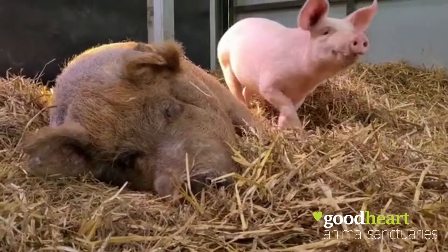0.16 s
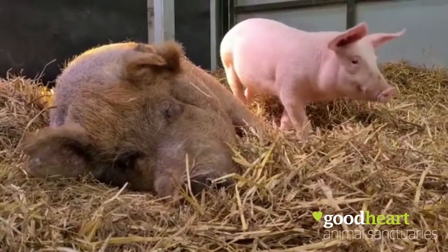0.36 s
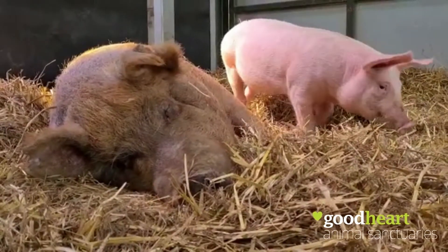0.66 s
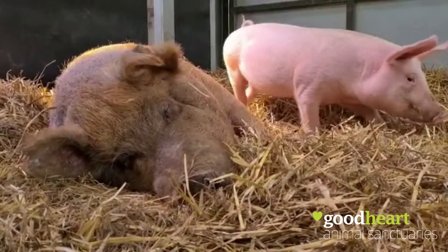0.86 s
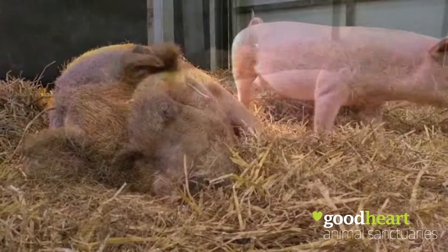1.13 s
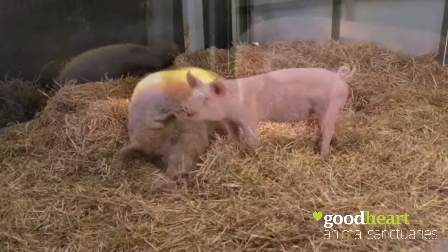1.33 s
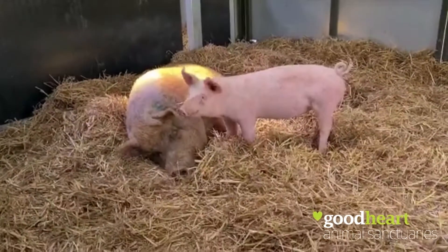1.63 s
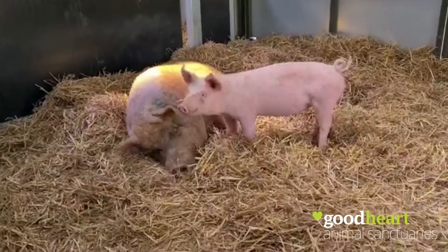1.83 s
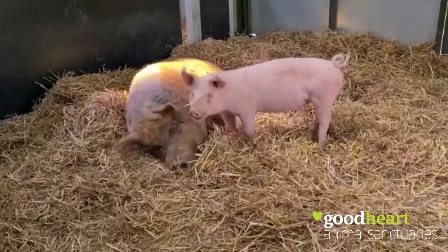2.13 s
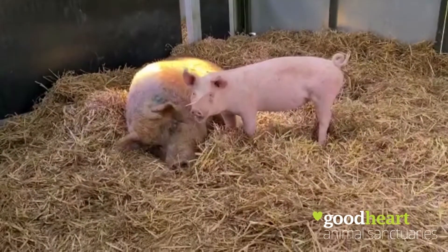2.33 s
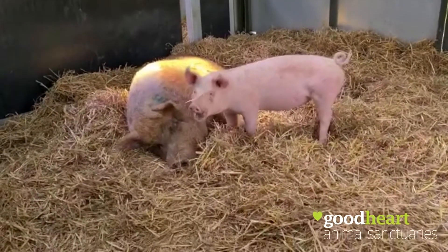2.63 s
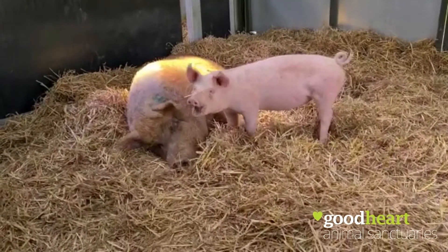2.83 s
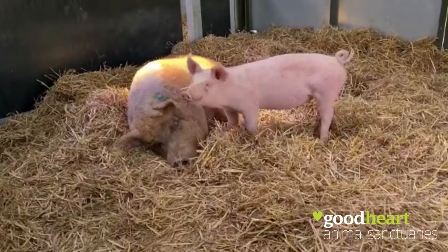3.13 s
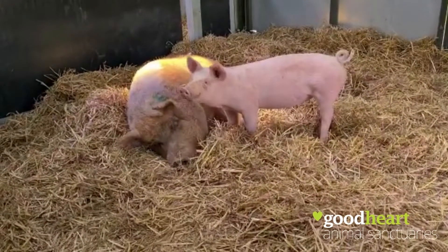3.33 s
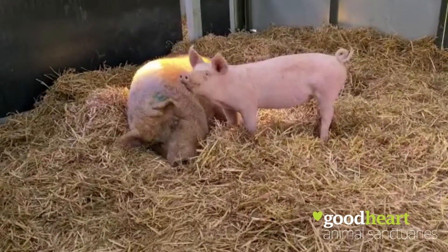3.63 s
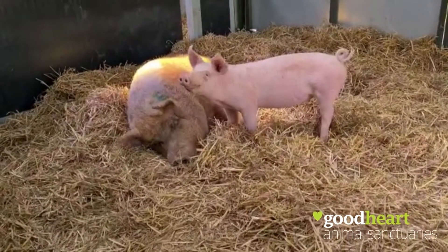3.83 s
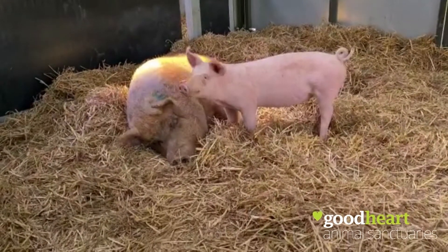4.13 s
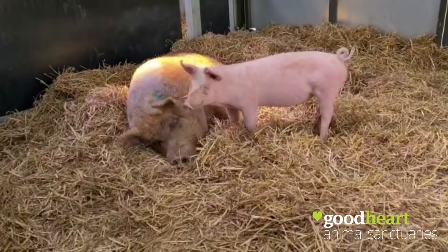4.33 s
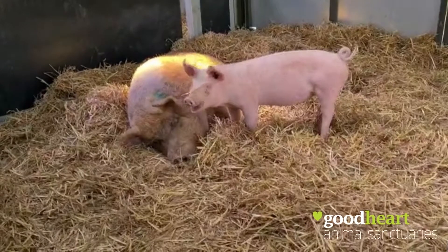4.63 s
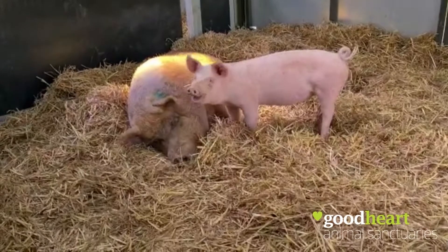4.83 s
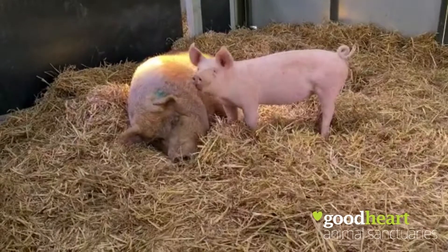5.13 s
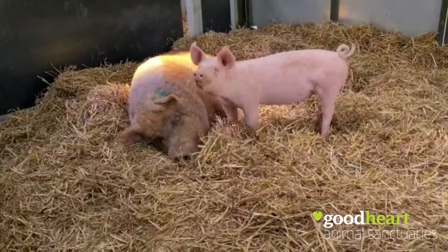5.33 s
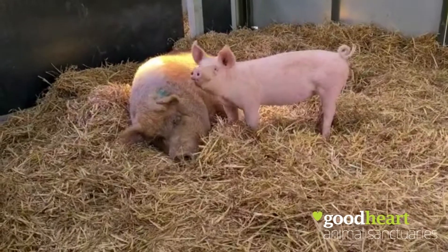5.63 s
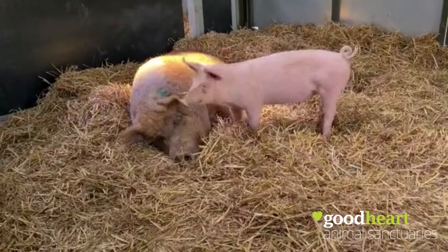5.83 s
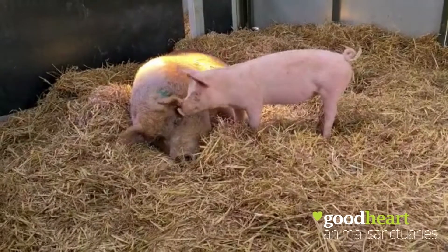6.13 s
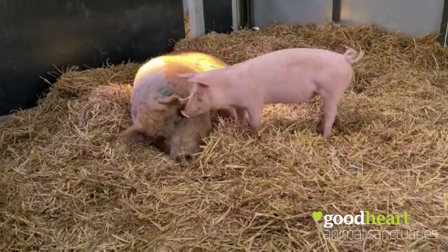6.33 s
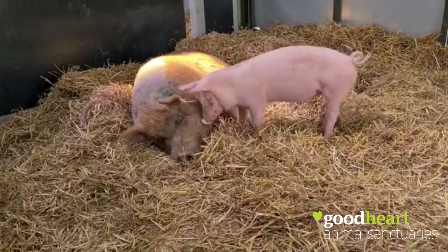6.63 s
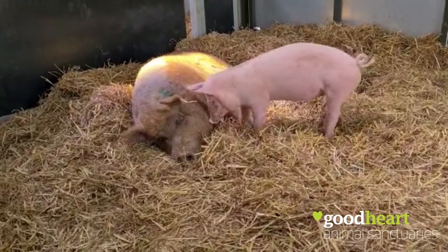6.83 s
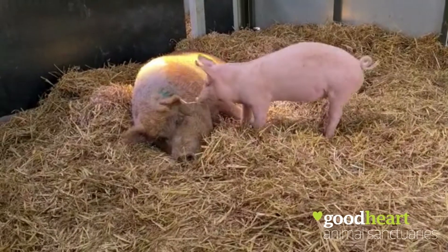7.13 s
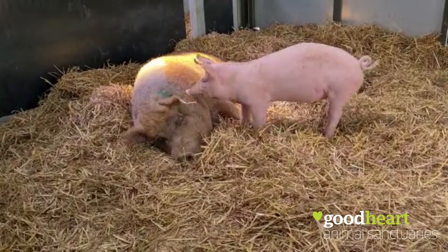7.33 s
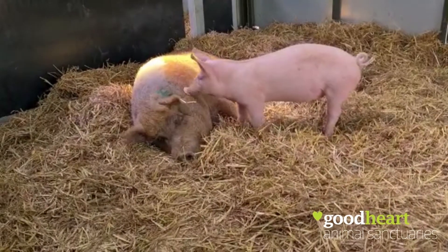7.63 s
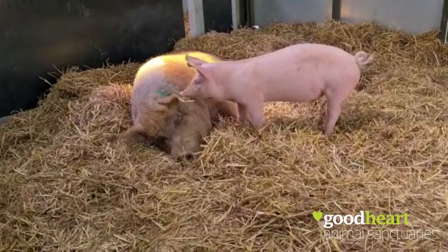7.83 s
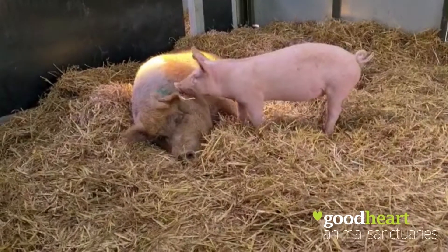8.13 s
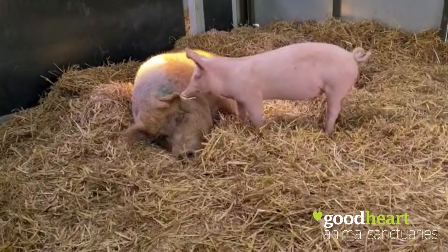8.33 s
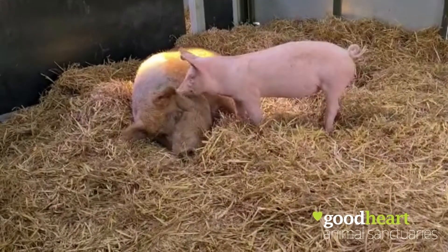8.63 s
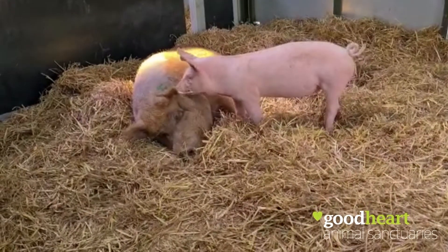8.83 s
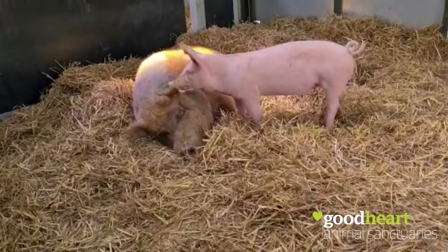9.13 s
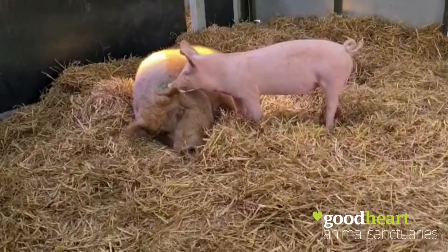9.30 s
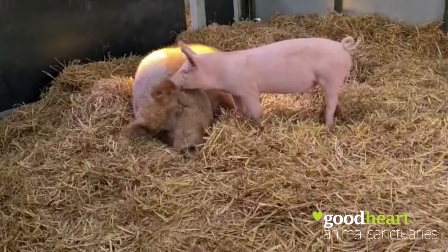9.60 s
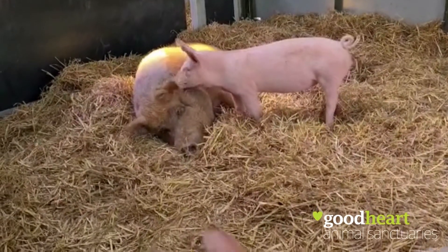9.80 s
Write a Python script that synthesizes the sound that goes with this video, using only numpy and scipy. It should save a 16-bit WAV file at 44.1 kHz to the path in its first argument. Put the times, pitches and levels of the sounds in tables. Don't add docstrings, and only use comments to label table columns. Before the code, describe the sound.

Quiet low barn rumble with a faint early hum. Three short pulsing piglet grunts come over dry crackling straw, with a fluttering snore beside them. Gentle rooting and small wooden knocks follow before a sudden latch rattle and rapid metal gate blows, deep and clanging, the loudest event. Afterward come snoring, more grunts and dense straw snaps. Pigs and bedding are close to a small stereo microphone, the gate echoing off to the right.

```python
import sys
import numpy as np
from scipy import signal
from scipy.fft import rfft, irfft, next_fast_len
from scipy.io import wavfile
from scipy.ndimage import uniform_filter1d

SR = 44100
rng = np.random.default_rng(int(sys.argv[2]) if len(sys.argv) > 2 else 0)


def unload_audio(sound):
    columns = np.transpose(np.atleast_2d(sound))
    steps = np.round(np.clip(columns, -1, 1) * 32767)
    wavfile.write(sys.argv[1], SR, steps.astype(np.int16))


def how_loud(loudness_db):
    steps = np.asarray(loudness_db, float) / 20
    return 10 ** steps


N = 439236

# (frequency [Hz], density [dB per Hz])
BARN_SPECTRUM = [(13, -37), (22, -21), (64, 7.5), (110, -7), (353, -14), (876, -30), (1650, -24),
                 (2930, -23), (6170, -25.5), (7680, -26.5), (8810, -72), (9840, -37), (11600, -35),
                 (15700, -41)]
# (start [s], end [s], level [dB], pitch [Hz])
DRONE_NOTES = [
    (0.01, 0.55, -64, 450),
    (.55, 1.1, -65, 716),
]
# (frequency [Hz], likeness [-1..1])
PORT_LIKENESS = [(60, 0.97), (130, 0.9), (290, 0.97), (640, 0.47), (1410, -0.18), (3100, -0.23),
                 (6820, 0.68), (15000, 0.84)]
# (frequency [Hz], left minus right [dB])
PORT_COLOUR = [(60, 3.5), (110, 2.5), (200, 2.5), (380, 3.5), (700, 4), (1290, -0.5), (2380, -4.5),
               (4400, -7.5), (8120, -1), (15000, -7)]

# (frequency [Hz], density [dB per Hz])
STRAW_SPECTRUM = [(290, -55), (500, -39), (545, -2.5), (957, -5.5), (1090, 2), (2150, 4.5), (2860, 10),
                  (4880, 7), (6420, 14.5), (8320, -1.5), (12600, -13), (15700, -17)]
# (peak [s], crackle [dB], rise [s per 20 dB], fall [s per 20 dB], thin stalks [dB])
TROTTER_STEPS = [(.48, -50, 0.99, 0.46, -2.5), (0.892, -50.5, 0.091, 0.25, 4.5),
                 (1.19, -46, 0.27, 0.44, -4.5), (1.5, -47.5, 0.05, 0.32, -2.5),
                 (1.64, -42.5, 0.032, 0.55, -3), (1.77, -56, .01, .015, 0), (1.95, -48.5, 0.011, 0.018, 3),
                 (2.269, -54, 0.21, 0.12, 0.5), (7.68, -37, 0.11, 0.095, -1), (7.936, -52, 0.54, 0.27, -3),
                 (8.259, -52.5, 0.056, 0.48, -11), (8.45, -49, 0.036, 0.31, 3), (8.56, -39, 0.07, 0.053, 0),
                 (8.85, -49.5, 0.095, 0.058, -1), (8.972, -44, 0.029, 0.59, -7),
                 (9.232, -41, 0.024, 0.08, -1), (9.278, -39.5, 0.05, 0.04, 2.5),
                 (9.42, -47.5, 0.31, 0.11, 3.5), (9.61, -49, 0.055, 0.041, 0.5),
                 (9.68, -53.5, 0.061, 0.11, 7.5), (9.747, -44.5, 0.078, 0.11, 6.5),
                 (9.81, -50, .05, 0.22, -13), (8.1, -79, 0.12, .1, -5)]
# (peak [s], crackle [dB], rise [s per 20 dB], fall [s per 20 dB], thin stalks [dB])
SNOUT_ROOTING = [(2.16, -58.5, 0.15, 1, -3.5), (2.38, -49, 0.95, 0.055, -21),
                 (2.728, -58.5, 0.013, 0.0099, -16), (2.86, -53, 0.065, 0.1, -19),
                 (3.422, -51, 0.32, 0.39, -12.5), (3.7, -48.5, 0.028, 0.16, -13),
                 (3.85, -60, .2, 0.95, -13), (4.268, -52.5, 0.05, 0.023, -16), (4.56, -57.5, 0.021, 1, -15),
                 (5.121, -56.5, 0.054, 0.14, -6.5), (5.411, -57.5, 0.031, 0.061, -31),
                 (5.67, -55, 0.026, 0.043, -9), (5.9, -56.5, 0.72, 0.41, -10),
                 (6.19, -58, 0.076, 0.4, -11.5), (6.508, -61, 0.033, 0.083, -32),
                 (6.59, -57, 0.072, 0.17, -32), (7.17, -53.5, 0.028, 0.25, -22)]
# (peak [s], thump [dB], rise [s per 20 dB], fall [s per 20 dB])
BODY_SHIFTS = [(1.74, -51, 0.95, 0.4), (2.32, -50, 0.25, 0.35), (3.5, -56, 1.16, 3),
               (5.599, -57.5, 1.2, 6.6), (6.79, -58.5, 1.4, 1.4), (7.81, -47.5, 0.6, 0.15),
               (8.528, -91, 0.54, 4.5), (9.248, -55, 0.63, 0.8), (9.95, -64.5, 3.4, 0.83)]
# (peak [s], level [dB], rise [s per 20 dB], fall [s per 20 dB])
STALK_BENDS = [(2.3, -70, 0.085, 0.93), (2.85, -58, 0.11, 0.15), (3.26, -56.5, 0.056, 0.16),
               (5.449, -54.5, 0.059, 0.034), (8.3, -60.5, 0.17, 0.49)]
# (peak [s], level [dB], centre [Hz], rise [s
# per 20 dB], fall [s per 20 dB])
SCUFF_PUFFS = [(.06, -68, 920, 0.12, 0.14), (.25, -57, 1900, .05, 0.028), (.93, -51.5, 1470, 0.11, 0.14),
               (0.951, -46, 263, 0.067, 0.042), (1.2, -46, 492, 0.065, 0.17),
               (1.419, -56, 1620, 0.27, 0.089), (1.869, -46.5, 2810, .015, 0.028),
               (2.2, -63.5, 1360, 0.015, 0.1), (8.95, -44.5, 2640, 0.019, 0.2),
               (7.739, -49.5, 1130, .06, 0.061), (8.72, -59.5, 2750, 0.091, 0.17),
               (4.89, -27, 194, .08, 0.13), (2.299, -60, 1250, 0.088, 0.35), (2.36, -64, 2970, .15, 0.08),
               (2.851, -57, 308, 0.2, 0.18), (2.86, -58, 4300, 0.081, .08), (3.122, -55.5, 166, 0.4, 0.14),
               (3.42, -66, 2580, 0.33, 0.51), (3.75, -58.5, 796, .08, 0.058), (5.179, -56, 230, 0.17, 0.13),
               (6.201, -60, 3940, 0.032, 0.037), (6.611, -53.5, 3700, 0.096, .07),
               (7.719, -56, 202, .05, .06), (7.779, -54.5, 1770, 0.12, 0.039),
               (7.885, -47, 2770, 0.014, 0.028), (7.901, -51.5, 160, 0.11, 0.086),
               (8.099, -57, 143, 0.164, 0.082), (8.75, -54, 138, 0.27, 0.33), (8.9, -71, 613, 0.055, 0.22),
               (9.0, -58, 4100, .06, 0.051), (9.109, -44, 390, 0.21, 0.077),
               (9.349, -55.5, 152, 0.37, 0.26), (9.741, -45, 4300, 0.083, 0.083)]
# (time [s], peak [dB], pitch [Hz], t60
# [s])
BOARD_KNOCKS = [(1.139, -38, 1160, .008), (1.371, -34, 634, .077), (2.18, -41, 643, .05),
                (2.181, -43, 1330, .07), (2.224, -45.5, 600, .08), (3.952, -39, 1850, .018),
                (3.953, -44, 2450, .012), (4.258, -44, 2700, .02), (5.449, -45.5, 455, .025),
                (5.612, -49, 2600, .012), (6.261, -32, 475, .02), (6.263, -47, 1300, .008)]
# (time [s], peak [dB],
# pitch [Hz], t60 [s])
STALK_SNAPS = [(.1994, -41.5, 7200, .015), (1.14, -42, 2700, .015), (1.322, -38, 3900, .02),
               (1.6192, -39, 7740, .023), (1.7624, -31, 6800, .035), (1.865, -38, 3200, .025),
               (1.945, -29, 9000, .03), (2.18, -44, 3300, .02), (2.708, -48, 4800, .02),
               (3.6596, -36, 4230, .028), (4.2612, -41, 3680, .015), (5.3844, -52, 3300, .015),
               (7.5273, -34, 6180, .025), (9.0882, -36.5, 6100, .03), (9.215, -36, 4500, .015),
               (9.4644, -33, 4800, .025), (9.62, -38, 5500, .015), (9.719, -29, 5000, .02)]
# (time [s], peak [dB], pitch [Hz])
STALK_TICKS = [(1.6195, -34, 9000), (1.326, -30, 4000), (9.468, -32, 6000), (1.676, -37, 8000),
               (1.7644, -27, 6030), (1.8155, -48, 9000), (1.869, -28.5, 4000), (1.949, -25, 11000),
               (2.477, -45.5, 11000), (2.603, -70, 9300), (2.7075, -47, 7000), (5.6565, -50, 6250),
               (6.7446, -49, 6580), (7.5517, -31, 7010), (8.2873, -40, 5250), (8.3664, -47, 6370),
               (8.7869, -44, 5660), (8.9431, -39, 6020), (9.0885, -37, 8100), (9.54, -43, 8000),
               (9.5756, -35, 12400), (9.621, -34, 8100), (9.7198, -25, 12000)]

# (time [s], flutter [Hz], effort [dB])
SNORE_TRACKS = [
    [(1.3, 114.1, -73), (1.394, 109.9, -54), (1.566, 104.9, -45), (1.978, 106.1, -51), (2.08, 109.3, -84)],
    [(5.43, 115.8, -61), (5.71, 97.65, -47), (6.162, 97.85, -48.5), (6.228, 98.5, -36.5),
     (6.294, 74.2, -44), (6.335, 61.9, -36), (6.38, 63.8, -56)],
    [(7.08, 109, -68), (7.148, 107.8, -47), (7.308, 105.4, -44.5), (7.5, 94.4, -54)],
]
# (start [s], end [s], level [dB])
SNORE_RASPS = [(1.614, 1.95, -49.5), (6.103, 6.174, -47.5), (6.277, 6.302, -41), (7.164, 7.452, -44.5)]
# (start [s], end [s], level [dB])
NOSTRIL_WHISTLES = [(0.458, 1.037, -63), (1.133, 1.415, -60), (1.5, 1.94, -59.5), (5.515, 5.744, -58),
                    (5.8, 6.292, -53), (6.693, 7.095, -65), (7.166, 7.873, -55)]

# (first flap [s], last flap [s], rate [flaps/s], strong-weak step [dB], quickening [s/flap^2])
GRUNT_FLAPS = [(.8485, .94, 39.3, 0, 0), (1.142, 1.24, 45.7, -1.5, 0), (1.609, 1.67, 40.3, -1.5, 0),
               (6.4645, 6.595, 51.5, -3, 0), (7.6225, 7.69, 40.2, 0, 0), (7.776, 7.93, 35.7, 0, .0011),
               (8.9565, 9.07, 38.9, 0, .00025), (9.55, 9.67, 44, 0, 0)]
# (throat [Hz], cheek [Hz], cheek [dB], mouth [Hz], mouth [dB], upper mouth [Hz])
GRUNT_TRACT = [(252, 600, -11, 1540, -1, 1490), (196, 600, -10, 1190, -15, 1770),
               (222, 600, -1.5, 1155, -5, 1780), (285, 390, 5, 1530, -8, 1430),
               (227, 490, -6.5, 1220, 3, 1760), (372, 380, 6, 1300, -13, 6600),
               (242, 530, 0.5, 1110, 1.5, 1780), (258, 310, -4, 1200, -2, 1720)]
# (peak [s], throat [dB], rise [s per 20 dB], fall [s per 20 dB])
GRUNT_BREATH = [(.895, -33, 0.083, 0.13), (1.216, -40.5, 0.4, 0.13), (1.648, -32.5, 0.086, 0.052),
                (6.56, -37, 0.22, 0.077), (7.666, -30, 0.13, 0.063), (7.896, -45.5, 0.16, 0.03),
                (9.056, -30.5, 0.26, 0.016), (9.64, -41, 0.17, 0.068)]
# (opens [s], mouth re throat [dB], nostril re throat [dB], closing [dB/s])
GRUNT_OPENING = [(.89, -13, -30, 155), (1.18, 9.5, -26, 0), (1.6, 2, -8.5, -6), (6.5, -3.5, -5, 83),
                 (7.61, -4, -21, -5), (7.77, -3, -31, 97), (8.95, 1.5, -19.5, 57),
                 (9.54, -32.5, -35, 202.5)]

# (time [s], peak [dB])
LATCH_HITS = [
    (4.578, -18.5),
    (4.599, -27.5),
    (4.6233, -55),
    (4.6632, -37),
]
# (frequency [Hz], level [dB], t60 [s])
LATCH_RING = [(780, -15, 0.036), (1330, -6.5, 0.015), (2360, -5, 0.012), (2520, -3.5, 0.011),
              (3820, -10, 0.012)]
# (time [s], boom [Hz], level [dB])
PANEL_SWING = [
    [(4.6, 64, -56), (4.782, 65.1, -25), (4.842, 61.2, -22.5), (4.886, 58.2, -16.5), (4.96, 64, -37),
     (5.0, 59.7, -22), (5.12, 57, -44), (5.3, 58.5, -55)],
]
# (frequency [Hz], level [dB], t60 [s])
PANEL_MODES = [(39.7, 4.5, 0.28), (98, 7, 0.16), (163, 4, 0.11), (184.3, 1, 0.49), (273, -2, 0.17),
               (342, -18, 0.068)]
# (time [s], crack peak [dB], edge [dB], lip [dB], rim [dB])
GATE_BLOWS = [
    (4.717, -14, -35, -61, -66),
    (4.7687, -10.5, -14.5, -22, -31.5),
    (4.798, -17, -36, -43.5, -34),
    (4.834, -29.5, -34.5, -35, -46),
    (4.868, -16.5, -25.5, -22.5, -48),
    (4.884, -17, -31.5, -31, -50),
    (4.907, -29, -42.5, -38, -51.5),
    (4.955, -36, -40.5, -44, -52),
]
# (frequency [Hz], level [dB], t60 [s])
SHEET_MODES = [(450, -9, 0.012), (636, 1, 0.011), (766, 1.5, 0.02), (1136, 2, 0.014), (1323, 6, 0.011)]
# (frequency [Hz], level [dB], t60 [s])
EDGE_MODES = [(1830, 2.5, 0.0086), (2110, -3, 0.016)]
# (frequency [Hz], level [dB], t60 [s])
LIP_MODES = [(2430, -6, 0.0069), (2760, -4, 0.014)]
# (frequency [Hz], level [dB], t60 [s])
RIM_MODES = [(3293, -1, 0.054), (3670, -25, 0.0055), (4570, -1.5, 0.012), (5000, -32, 0.0034),
             (5610, -14, 0.019), (6660, -11, 0.016)]
# (frequency [Hz], level [dB], t60 [s])
BAR_MODES = [(427, -6.5, 0.6), (580, -2.5, 0.37), (724, -2, 0.48), (1090, 0, 0.2), (1140, -2, 0.3),
             (1167, -8, 0.27), (1290, 4.5, 0.26), (1640, -6.5, 0.27), (2080, -8, .3), (2148, -0.5, .35),
             (2552, -13, .3), (2794, -10, 0.42), (3359, -8.5, .35), (3671, -18, .3)]


def level(x, db):
    return x * how_loud(db) / np.sqrt(np.mean(x ** 2) + 1e-20)


def on_log(points, hz):
    f, v = np.transpose(points)
    return np.interp(np.log(hz), np.log(f), v)


def shape(x, gain):
    size = next_fast_len(x.shape[-1])
    hz = np.maximum(np.arange(size // 2 + 1) * SR / size, 1)
    return irfft(rfft(x, size) * gain(hz), size)[..., :x.shape[-1]]


def band(x, lo_hz, hi_hz):
    sos = signal.butter(2, [lo_hz, min(hi_hz, .48 * SR)], "bandpass", fs=SR, output="sos")
    return signal.sosfilt(sos, x)


def ring(x, hz, t60):
    pole = np.exp(2j * np.pi * hz / SR - np.log(1000) / (t60 * SR))
    return signal.lfilter([1], [1, -pole], x).imag


def swell(x, hz, t60):
    return ring(ring(x, hz, t60), hz, t60) * 2 * np.e * np.log(1000) / (t60 * SR)


def track(tables, column, off):
    t, out = np.arange(N) / SR, np.full(N, float(off))
    for rows in map(np.array, tables):
        on = slice(int(rows[0, 0] * SR), int(rows[-1, 0] * SR))
        out[on] = np.interp(t[on], rows[:, 0], rows[:, column])
    return out


def fade(gain, seconds):
    return uniform_filter1d(gain, int(seconds * SR))


def flicker(rate, depth_db):
    hold = int(SR / rate)
    steps = np.repeat(rng.standard_normal(N // hold + 1), hold)
    return how_loud(depth_db * uniform_filter1d(steps, hold)[:N])


def swells(rows):
    t = np.arange(0, N / SR + .01, .001)
    power = 0
    for start, end, db, rise, fall in rows:
        drop = np.maximum(np.maximum((start - t) / rise, (t - end) / fall), 0)
        power = power + how_loud(db - 20 * drop) ** 2
    return np.interp(np.arange(N) / SR, t, np.sqrt(power))


def wide(pair):
    mid = shape(pair[0], lambda hz: np.sqrt(1 + np.clip(on_log(PORT_LIKENESS, hz), -.9, .99)))
    side = shape(pair[1], lambda hz: np.sqrt(1 - np.clip(on_log(PORT_LIKENESS, hz), -.9, .99)))
    return np.array([mid + side, mid - side]) / 2 ** .5


def barn():
    air = shape(wide(rng.standard_normal((2, N))), lambda hz: how_loud(on_log(BARN_SPECTRUM, hz)))
    hum = rng.standard_normal(N)
    drone = sum(level(ring(hum, hz, 0.074), -1.5) * swells([(start, end, db, .6, .3)])
                for start, end, db, hz in DRONE_NOTES)
    return level(air, -54) * flicker(3.6, 0.11) + drone


def patchy(x, lo_hz, hi_hz, patch_hz):
    whole = band(x, lo_hz, hi_hz)
    return whole + band(whole, patch_hz / 1.25, patch_hz * 1.25) * (flicker(20, 3) - 1)


def straw():
    unequal = np.minimum(rng.exponential(size=(2, N)), 5)
    clicks = rng.standard_normal((2, N)) * how_loud(3.0 * unequal)
    rustle = wide(shape(clicks * flicker(70, 2.16), lambda hz: how_loud(on_log(STRAW_SPECTRUM, hz))))

    tread = .028
    steps, rooting = (swells([(s - tread, s + tread, db, rise, fall) for s, db, rise, fall, _ in rows])
                      for rows in (TROTTER_STEPS, SNOUT_ROOTING))
    thin = swells([(s - tread, s + tread, db + thin_db, rise, fall)
                   for s, db, rise, fall, thin_db in TROTTER_STEPS + SNOUT_ROOTING])
    thick = np.hypot(steps * how_loud(-4), rooting * how_loud(-3))

    crackle = level(patchy(rustle, 2210, 5640, 3870), -4.0) * fade(np.hypot(steps, rooting), .01)
    hiss = level(patchy(rustle, 11960, 15160, 12600), -1.84) * fade(thin, 0.0045)
    stalks = level(patchy(rustle, 660, 2980, 750), -0.8) * fade(thick, 0.015)
    bends = level(band(wide(clicks[::-1]), 570, 1070), 0)
    bends = bends * swells([(s, s, db, rise, fall) for s, db, rise, fall in STALK_BENDS])
    thumps = level(band(wide(rng.standard_normal((2, N))), 175, 600), -2.5) * flicker(18, 3)
    thumps = thumps * swells([(s, s, db, rise, fall) for s, db, rise, fall in BODY_SHIFTS])
    return crackle + hiss + stalks + bends + thumps


def scuffs():
    lead, width = .4, 1.125
    out, t = np.zeros((2, N)), np.arange(-lead, .5, 1 / SR)
    for when, db, hz, rise, fall in SCUFF_PUFFS:
        air = band(rng.standard_normal((2, len(t))), hz / width, hz * width)
        air = level(band(air, hz / 1.95, hz * 1.8), db)
        air[1] = .7 * air[0] + .7 * air[1]
        puff = air * how_loud(-20 * np.maximum(-t / rise, t / fall))
        at = int((when - lead) * SR)
        out[:, max(at, 0):at + len(t)] += puff[:, max(-at, 0):N - at]
    return out


def small_hits():
    out, t = np.zeros(N), np.arange(5000) / SR
    for when, db, hz, t60 in BOARD_KNOCKS:
        contact = rng.standard_normal(len(t)) * np.exp(-t / 0.005)
        hit = ring(contact, hz, t60) + 5.7 * band(contact, 0.84 * hz, hz + 1300)
        out[int(when * SR):][:len(t)] += how_loud(db) * hit / np.abs(hit).max()
    for when, db, hz, t60 in STALK_SNAPS:
        burst = rng.standard_normal(len(t)) * how_loud(-60 * t / t60) * (1 - np.exp(-t / .003))
        hit = band(burst, .58 * hz, 2.4 * hz)
        out[int(when * SR):][:len(t)] += how_loud(db) * hit / np.abs(hit).max()
    return out


def sleeper():
    wobble = uniform_filter1d(rng.standard_normal(N), 400)
    phase = 2 * np.pi * np.cumsum(track(SNORE_TRACKS, 1, 100) * (1 + .5 * wobble)) / SR
    flutter = np.sin(phase) + 0.2 * np.sin(2 * phase) + 0.19 * np.sin(3 * phase)
    flutter = flutter * 2 ** .5 * flicker(25, 3.4)
    puff = 1 + .5 * np.sin(phase)

    rasp = level(band(rng.standard_normal(N), 150, 298) * puff, -5.5)
    air = rng.standard_normal(N) * puff
    whistle = level(swell(air, 2740, 0.013) + how_loud(-2) * swell(air, 2980, 0.009), -0.62) * flicker(54, 1.3)
    overtone = level(swell(air, 12200, .006), -25)

    flutter_gain = fade(how_loud(track(SNORE_TRACKS, 2, -120)), 0.092)
    rasp_gain = swells([row + (0.14, 0.057) for row in SNORE_RASPS])
    whistle_gain = swells([row + (0.23, 0.089) for row in NOSTRIL_WHISTLES])
    return flutter * flutter_gain + rasp * rasp_gain + (whistle + overtone) * whistle_gain


def vocal_tract(flap, burst, snout, chance):
    throat_hz, cheek_hz, cheek_db, mouth_hz, mouth_db, upper_hz = snout
    snap = .25 * flap
    snap[0] = flap[0]
    size, slack = how_loud(1.2 * chance), 1 + .025 * chance

    low = size[0] * swell(flap, throat_hz * slack[1], 0.017)
    low = low + how_loud(cheek_db) * swell(flap, cheek_hz * slack[0], 0.0093)
    low = low + how_loud(-7.5) * band(swell(flap, 107.0, 0.043), 68, 153)

    mid = how_loud(mouth_db) * swell(snap, mouth_hz * slack[2], 0.0085)
    mid = mid + size[3] * swell(snap, upper_hz * slack[3], 0.0099)
    mid = mid + how_loud(-22) * swell(burst, 1800, 0.003) / 4
    mid = mid + how_loud(-10) * swell(snap, 3880, .007) + how_loud(-11) * swell(snap, 2250, .005)

    top = size[4] * swell(snap, 2700 * slack[4] ** .5, .009)
    top = top + how_loud(-15) * swell(snap, 3750, .006) + how_loud(-5) * swell(snap, 2900, .004)
    return low, mid, top


def piglet():
    out, t = np.zeros(N), np.arange(6000) / SR
    onset = (1 - np.exp(-t / .0018)) ** 2
    leak = how_loud(-33) * (1 - np.exp(-t / 0.003)) * np.exp(-(t / .018) ** 2)
    for timing, snout, breath, opening in zip(GRUNT_FLAPS, GRUNT_TRACT, GRUNT_BREATH, GRUNT_OPENING):
        first, last, rate, step_db, quicken = timing
        peak, peak_db, rise, fall = breath
        opens, open_db, nose_db, closing = opening
        chance, rasp = rng.standard_normal((12, 6)), rng.standard_normal((12, len(t)))
        for k, when in enumerate(np.arange(first, last, 1 / rate)):
            when = when - quicken * k ** 2
            sounding = when + .004
            throat = peak_db - 20 * max((peak - sounding) / rise, (sounding - peak) / fall)
            shut, narrowing = sounding < opens, closing * max(when - opens, 0)
            mouth = open_db - narrowing + shut * -19
            nose = nose_db - narrowing + shut * -17.5

            burst = rasp[k] * np.exp(-t / .008)
            flap = .055 * burst + leak * rasp[k, ::-1]
            flap[0] = -1
            flap[int(SR / rate * (.55 + .08 * chance[k, 2]))] = .22 * chance[k, 1]

            low, mid, top = vocal_tract(flap, burst, snout, chance[k])
            uneven = step_db * (-1) ** k
            bright = onset * (how_loud(mouth + 6.0 - uneven) * mid + how_loud(nose + 25.5 + uneven) * top)
            at = int((when - .001 + .0007 * chance[k, 5]) * SR)
            out[at:at + len(t)] += how_loud(throat + 6.0) * (low + bright)
    return out


def ticks():
    out, t = np.zeros(N), np.arange(900) / SR
    for when, db, hz in STALK_TICKS:
        hit = band(rng.standard_normal(len(t)) * how_loud(-60 * t / 0.0064), 0.49 * hz, 1.4 * hz)
        out[int(when * SR):][:len(t)] += how_loud(db) * hit / np.abs(hit).max()
    return out


def clatter(when, parts, quick_s, tail, tail_s, spread):
    t, out = np.arange(13000) / SR, np.zeros((2, N))
    decay = np.exp(-t / quick_s) + tail * np.exp(-t / tail_s)
    burst = wide(rng.standard_normal((2, len(t)))) * (1 - np.exp(-t / 0.0045)) * decay
    modes = [(hz, part_db + db, t60) for group, part_db in parts for hz, db, t60 in group]
    detune = 1 + spread * rng.standard_normal(len(modes))
    wash = sum(how_loud(db) * swell(burst, hz, .45 * t60) for hz, db, t60 in modes)
    lines = sum(how_loud(db) * swell(burst, hz * k, t60) for (hz, db, t60), k in zip(modes, detune))
    out[:, int((when - .0025) * SR):][:, :len(t)] = lines + 3.6 * band(wash, 400, 9000)
    return out


def latch():
    return sum(clatter(when, [(LATCH_RING, db - 21.5)], 0.0015, 0.075, 0.032, 0.011)
               for when, db in LATCH_HITS)


def panel():
    boom = 2 ** .5 * np.sin(2 * np.pi * np.cumsum(track(PANEL_SWING, 1, 59)) / SR)
    shake = wide(rng.standard_normal((2, N)))
    clang = level(sum(how_loud(db) * ring(shake, hz, t60) / t60 ** .5 for hz, db, t60 in PANEL_MODES), -1.4)
    lag, rise, fall = 0.0082, 0.046, 0.15
    efforts = []
    for when, db, *_ in GATE_BLOWS:
        first_db = -4.5 * (when == GATE_BLOWS[0][0])
        efforts.append((when + lag, when + lag, db - 4.5 + first_db, rise, fall))
    return boom * fade(how_loud(track(PANEL_SWING, 2, -120)), 0.016) + clang * swells(efforts)


def gate():
    out = np.zeros((2, N))
    for when, crack_db, edge_db, lip_db, rim_db in GATE_BLOWS:
        parts = [(SHEET_MODES, crack_db - 27.0), (EDGE_MODES, edge_db - 20.5),
                 (LIP_MODES, lip_db - 14.5), (RIM_MODES, rim_db - 19.0)]
        out += clatter(when, parts, 0.0075, 0.083, 0.092, 0.0354)
    return out


def bars():
    out, t = np.zeros((2, N)), np.arange(22000) / SR
    for when, crack_db, *_ in GATE_BLOWS[1:]:
        mix, start = rng.standard_normal((2, len(BAR_MODES), 2))
        wander = uniform_filter1d(rng.standard_normal((len(BAR_MODES), len(t))), 400) * 20
        rattle = how_loud(4 * wander)
        lines = 0
        for (hz, db, t60), m, p, r in zip(BAR_MODES, how_loud(3 * mix), start, rattle):
            detuned_hz = hz * (1 + .008 * p[0])
            tone = np.sin(2 * np.pi * detuned_hz * t + 3 * p[:, None])
            lines = lines + how_loud(db - 60 * t / t60) * np.outer(m, r) * tone
        out[:, int(when * SR):][:, :len(t)] += how_loud(crack_db - 24) * lines * (1 - np.exp(-t / 0.018))
    return out


def echoes(x, t60, db):
    t = np.arange(int(.9 * SR)) / SR
    noise = wide(rng.standard_normal((2, len(t))))
    dull = band(noise, 38.5, 1930)
    tail = dull * how_loud(-60 * t / t60) + (noise - dull) * how_loud(-60 * t / (0.2 * t60))
    tail = tail * (t > .006)
    tail = how_loud(db) * tail / np.sqrt(np.sum(tail ** 2) / 2)
    return signal.fftconvolve(np.atleast_2d(x), tail, axes=1)[:, :N]


def at_ports(x, lead_s, knee_hz=900):
    def advance(hz):
        return np.exp(2j * np.pi * hz * lead_s * hz ** 2 / (hz ** 2 + knee_hz ** 2))
    return np.array([x, shape(x, advance)])


def scene():
    near, rattle, blows = piglet() + small_hits(), latch(), gate()
    pigs = at_ports(near, 0.00013) + at_ports(sleeper(), .00001) + echoes(near, .36, -15.5)
    bang = 0.47 * at_ports(blows[0], -0.000512, knee_hz=450) + how_loud(-6.5) * blows[::-1] + rattle
    bang = bang * how_loud(np.array([[-1.25], [1.25]]))
    bedding = straw() + scuffs() + at_ports(ticks(), 0.0001)
    return barn() + bedding + pigs + panel() + bang + echoes(bang, 0.93, -18) + bars()


def top_cut(x):
    return signal.sosfilt(signal.butter(12, 15900, fs=SR, output="sos"), x)


def record(dry):
    ports = shape(dry, lambda hz: how_loud(np.array([[.5], [-.5]]) * on_log(PORT_COLOUR, hz)))
    ports = signal.sosfilt(signal.butter(2, 38, "highpass", fs=SR, output="sos"), ports)
    ports = np.tanh(ports / 1.5) * 1.5
    return top_cut(ports)


dry = scene()
out = record(dry)
unload_audio(out)
```